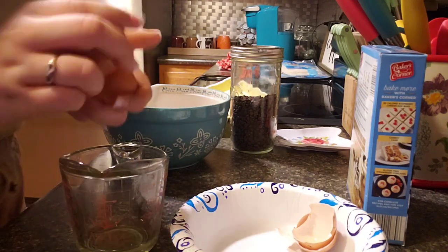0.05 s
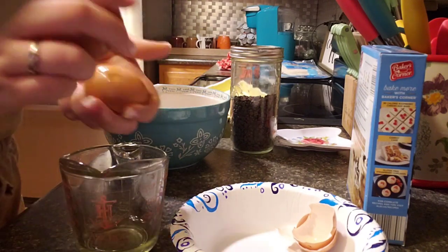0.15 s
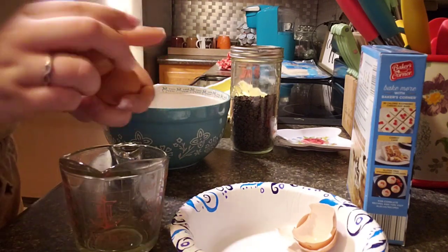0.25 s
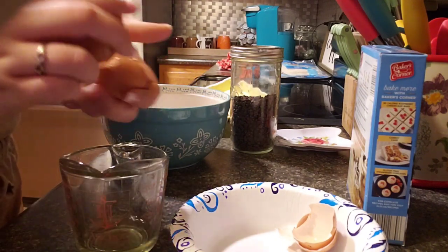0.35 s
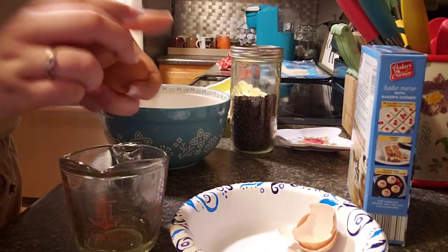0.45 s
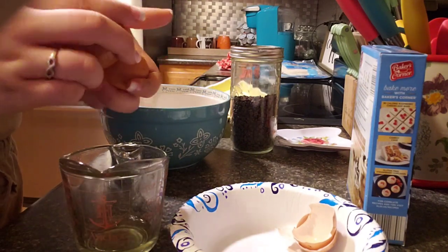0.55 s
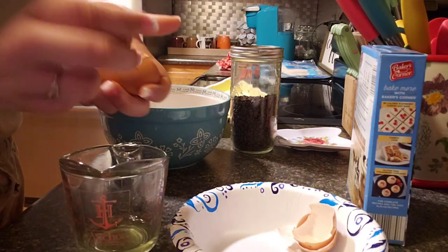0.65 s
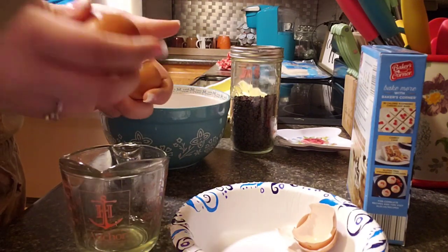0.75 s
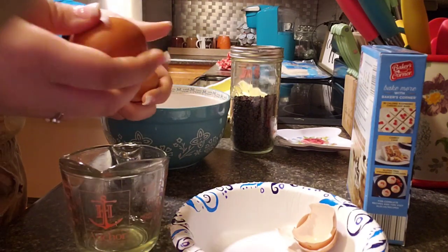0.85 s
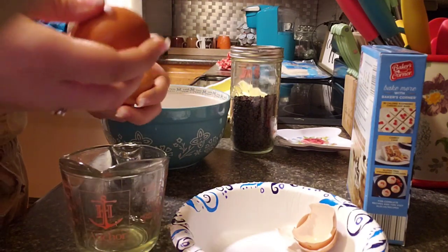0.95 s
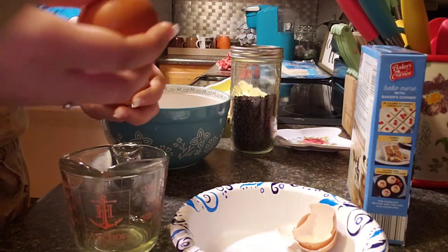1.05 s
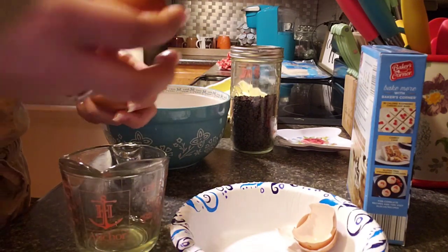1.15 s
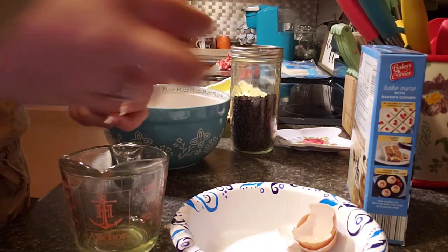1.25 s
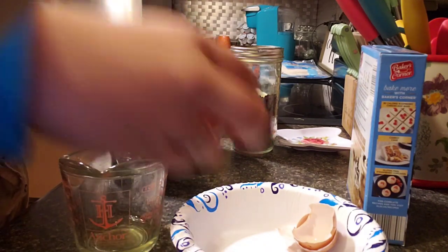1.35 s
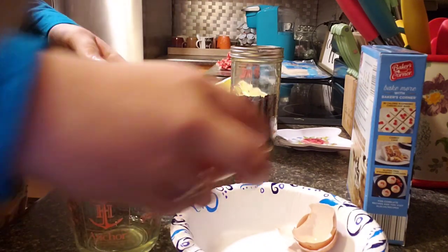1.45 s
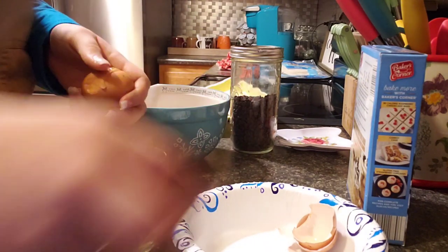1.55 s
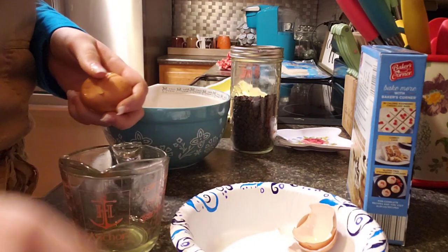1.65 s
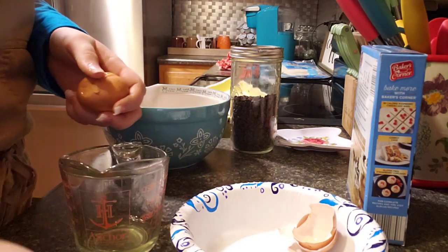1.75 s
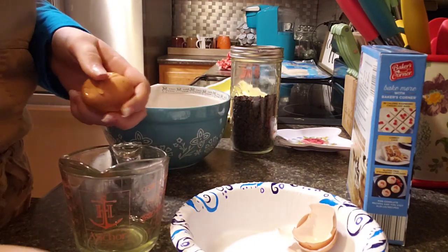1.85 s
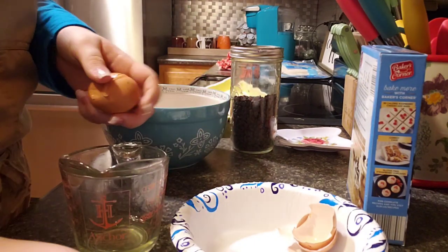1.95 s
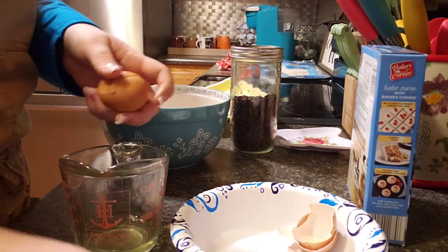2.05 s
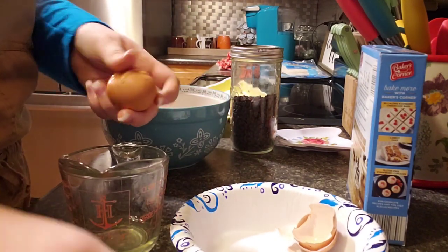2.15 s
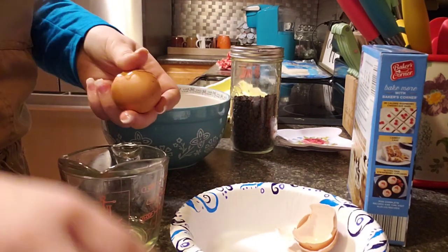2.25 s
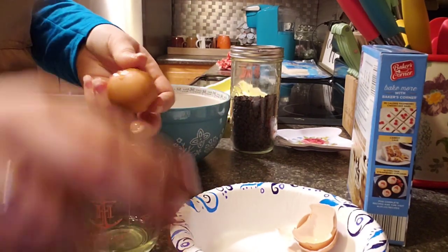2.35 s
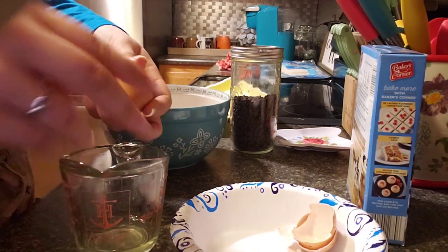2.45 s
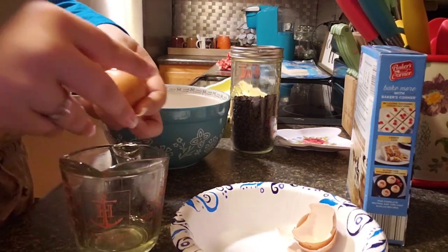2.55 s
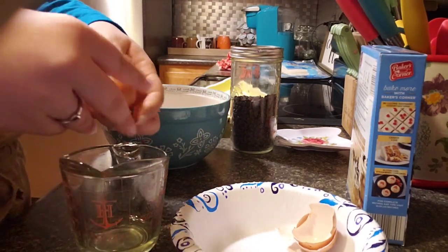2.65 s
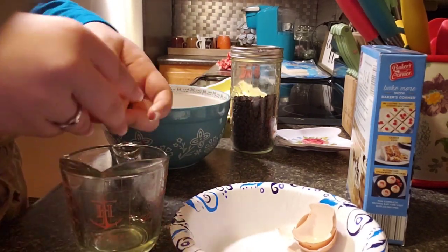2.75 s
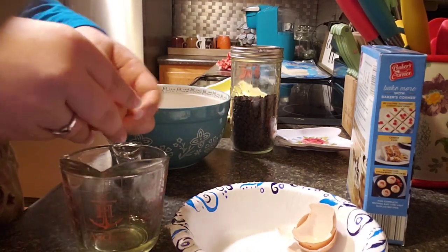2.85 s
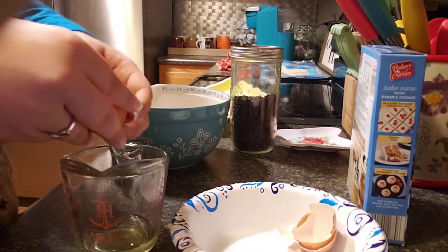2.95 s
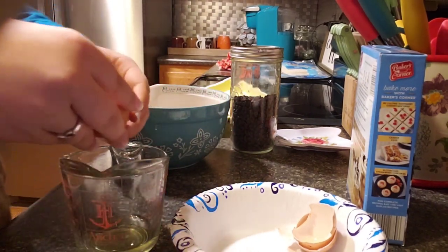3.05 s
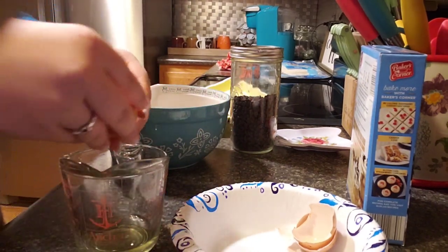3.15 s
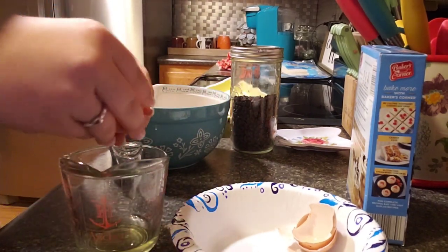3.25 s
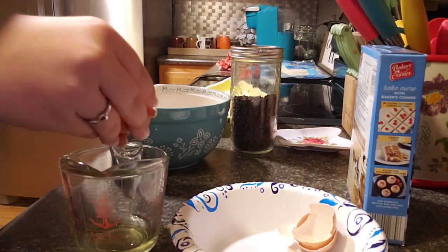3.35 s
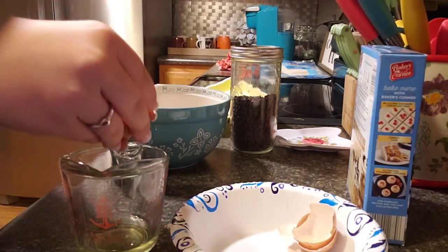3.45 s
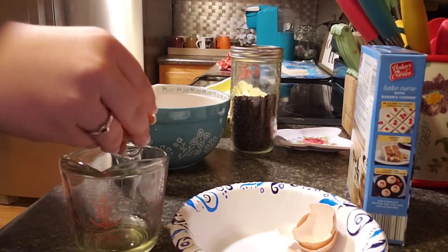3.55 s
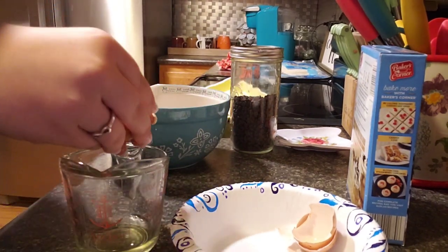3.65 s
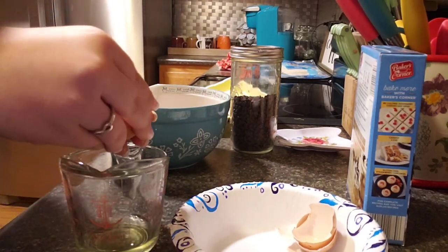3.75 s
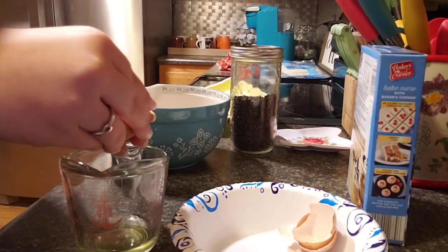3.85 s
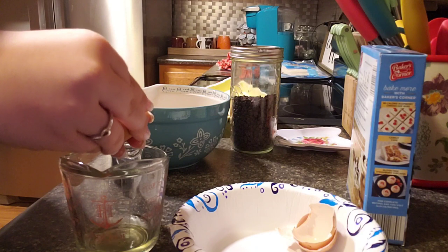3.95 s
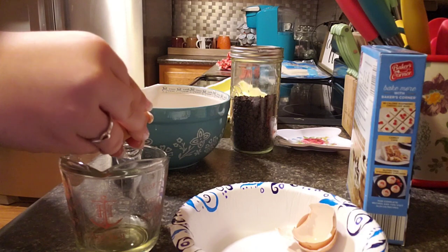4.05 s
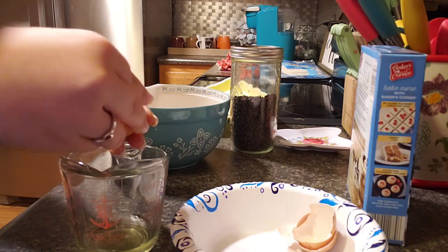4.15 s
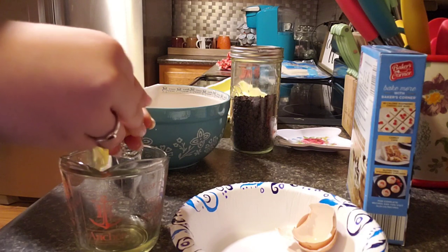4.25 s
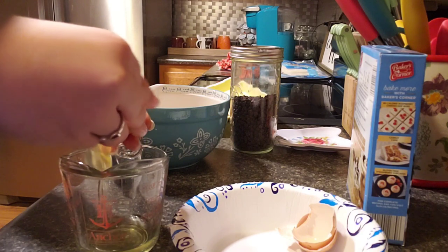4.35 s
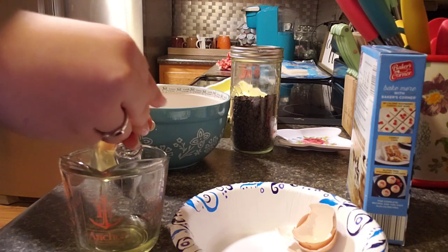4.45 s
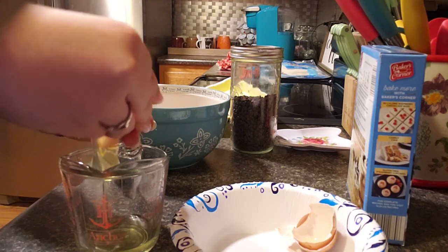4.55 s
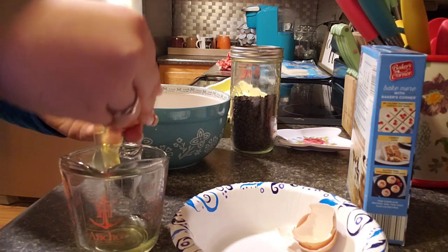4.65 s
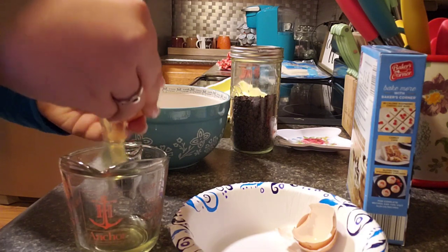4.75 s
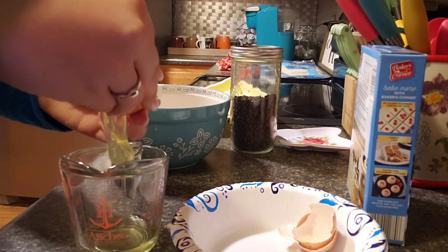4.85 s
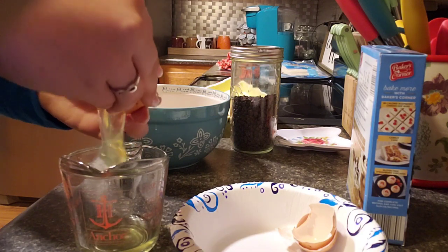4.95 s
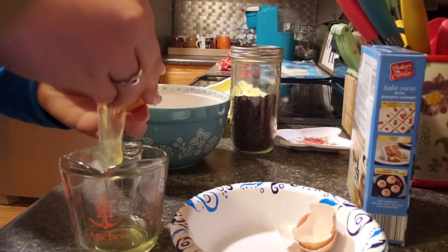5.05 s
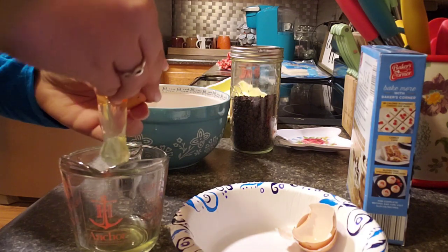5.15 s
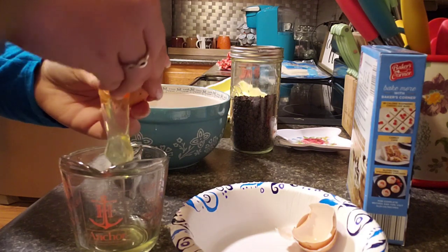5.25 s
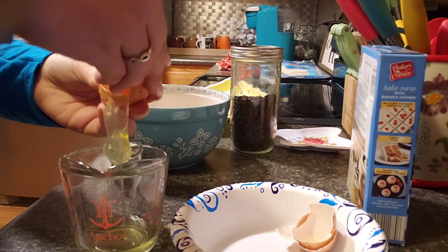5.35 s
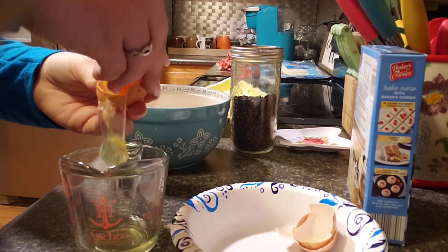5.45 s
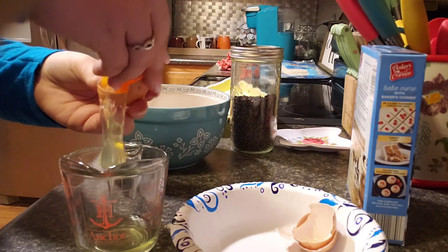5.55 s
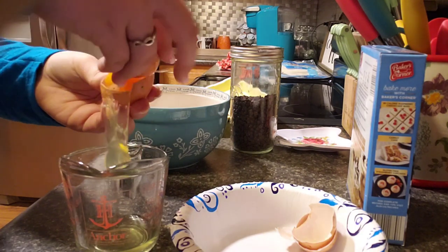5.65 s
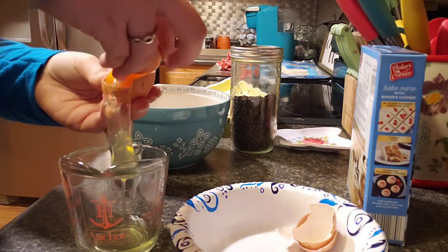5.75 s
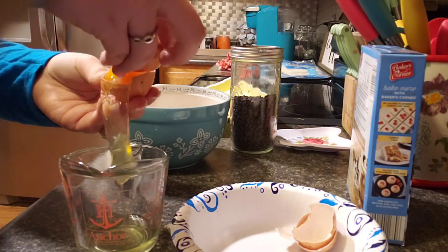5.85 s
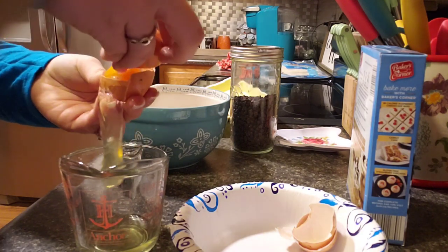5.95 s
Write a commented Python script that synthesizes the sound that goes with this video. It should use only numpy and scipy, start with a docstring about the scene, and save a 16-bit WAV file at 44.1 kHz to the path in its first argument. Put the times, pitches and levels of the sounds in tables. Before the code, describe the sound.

A close stereo pocket microphone hears a small, hard kitchen with steady low appliance rumble, airy noise and a very faint motor tone. The tail of an earlier tap fades at the start. Three sharp, brittle egg taps come at about 0.1, 0.3 and 0.5 seconds, the last weaker, the later two with a slight hollow knock. A tiny tick at 0.8 and soft hand rustles around 1 second follow. At 1.84 a dish lands with a dull, quick double thud and bright slap, then bumps and rocks faintly until 2.1. The egg rubs in the palm, gripped at 2.55; light rustling continues. From 2.8 small shell ticks gather, crackling toward one loud bright snap at 4.15. Lesser snaps follow, with a crunchy cluster near 4.8. Faint wet slips occur around 4.0 and 5.0. Soft ticks and rustles end the scene from 5.5 to 5.9.

```python
"""A small hard kitchen, heard close by through a two-port pocket microphone with slow gain control.
An egg is tapped three times on a rim: bursts of tiny breaks ring the shell and the hollow.
A dish set down and rocking rings in decaying modes. Thumbs prise the shell apart: short bursts ring
loose flakes, dense crackle sounds in a few bands. Hands rustle and egg white slips in swelling noise
bands; an appliance rumbles: steady air noise, a low boom, a faint band of hiss and a motor tone."""
import sys
import numpy as np
from scipy import signal
from scipy.io import wavfile
from scipy.ndimage import uniform_filter1d

SR = 44100
rng = np.random.default_rng(int(sys.argv[2]) if len(sys.argv) > 2 else 0)


def boost(x):
    """Linear amplitude factor 10**(x/20) for a level x in decibels (scalar or array-like)."""
    u = np.asarray(x, float) / 20
    return 10 ** u


def master_out(mix):
    """Clip the mix to full scale and print it as 16-bit PCM to the path in sys.argv[1]."""
    frames = np.transpose(np.atleast_2d(mix))
    ceiling = np.clip(frames, -1, 1)
    pcm = np.round(ceiling * 32767).astype(np.int16)
    wavfile.write(sys.argv[1], SR, pcm)


N = 264511

# egg taps on the rim [t/s, level/dB, treble tilt/(dB/octave), hollow knock re tap/dB, rise/s]
TAPS = [(0.0869, -4.5, -3, -39, 0.00062), (0.2988, -2.5, 2.5, -22.5, 0.0023),
        (0.5084, -9, 1, -19.5, 0.00067)]
# snaps under the thumbs [t/s, level/dB, loose flake f/Hz, treble tilt/(dB/octave)]
SNAPS = [(0.796, -45.5, 7480, 4), (2.8, -36.5, 6919, -5.5), (3.2135, -34, 8700, -1), (3.429, -31, 7080, 5),
         (3.835, -33.5, 12400, 3), (3.897, -33.5, 4460, -2.5), (3.9345, -30.5, 6976, -3.5),
         (4.0275, -21, 4560, -12), (4.0957, -28, 7840, -7), (4.1333, -26.5, 4480, -9),
         (4.1458, -3, 4690, 6), (4.3197, -23.5, 2420, -2.5), (4.4315, -23, 3745, 0),
         (4.7645, -21, 2560, -5), (4.7845, -15, 2800, -4), (4.7985, -15, 2600, -6),
         (5.6757, -29.5, 2250, -8), (5.707, -36.5, 2000, -1)]
TAP_S, SNAP_S = 0.017, 0.0054  # burst envelope down 25 dB
# resonances of the whole egg on the rim [f/Hz, width/Hz, level/dB]
SHELL_MODES = [(900, 76, 4), (1790, 130, 1.5), (2560, 240, 2), (7240, 71, -2), (9780, 300, -4.5)]
# broad radiation of the shell [f/Hz, level/dB]
SHELL_BODY = [(450, -22), (900, -18.5), (2700, -1), (8400, -7), (11000, -9.5), (16000, -21)]
# shell tearing in a dense crackle [t/s, length/s, level/dB, treble tilt/(dB/octave)]
CRUNCHES = [(4.023, 0.14, -49, -3.5), (4.158, 0.31, -60, -4.5), (4.682, 0.064, -59, -3),
            (4.752, 0.084, -44.5, -3.5), (4.805, 0.155, -66, -12.5)]
# bands of the crackle; the one near 3.7 kHz is coloured by the microphone port [f/Hz, width/Hz, level/dB]
CRACKLE_BANDS = [(2497, 670, -3.5), (3690, 600, -2), (4730, 710, -4)]
# thumbs strain the shell [t/s, rise/s, length/s, hiss level/dB, tick level/dB]
STRAINS = [(3.179, 0.045, 0.4, -62, -43.5), (3.543, 0.0259, 0.17, -82.5, -48.5),
           (3.73, 0.2, 0.36, -56, -39.5), (5.63, 0.072, 0.14, -54.5, -45)]
# dish lands and bounces, then bumps as it rocks [t/s, blow level/dB, hardness/0-1]
KNOCKS = [(1.8352, -17, 0.98), (1.8431, -23.5, 1), (1.971, -38.5, 0.75), (2.014, -43, 0.6),
          (2.113, -38.5, 0)]
# dish modes [f/Hz, level/dB, t60/s]
DISH_MODES = [(86, -3, 0.15), (281, -10, 0.08), (419, -1, 0.05), (480, -9, 0.08), (609, -9, 0.05),
              (692, -7, 0.06), (815, -4, 0.06), (923, -13, 0.04)]
# dish chatters as it rocks [start t/s, length/s, level/dB]
ROCKS = [(1.876, 0.073, -79), (1.968, 0.055, -84), (2.075, 0.046, -83.5)]
# dying room tail of an earlier tap (row at 0 s); then hands, sleeves and skin
# [t/s, rise/s, length/s, level/dB, centre f/Hz]
RUSTLES = [(0, .001, 0.12, -54, 2520), (0.966, 0.063, 0.23, -54, 3060), (0.984, 0.041, 0.53, -73, 6730),
           (1.096, 0.0045, 0.094, -51, 3240), (1.098, 0.05, 0.48, -55.5, 2610),
           (2.698, 0.35, 0.84, -61, 2650), (2.92, 0.1, 0.33, -60, 8240), (2.985, 0.15, 0.33, -56.5, 1480),
           (5.076, 0.04, 0.14, -60.5, 2330), (5.53, 0.0094, 0.1304, -65, 7970),
           (5.766, 0.074, 0.14, -60, 7300)]
# egg white slips [t/s, rise/s, length/s, level/dB, centre f/Hz]
SLOPS = [(4.027, 0.045, 0.23, -56.5, 614), (5.039, 0.017, 0.036, -48.5, 323)]
# egg turned in the palm, then gripped [t/s, rise/s, length/s, level/dB]
TURNS = [(1.882, 0.089, 1, -59), (2.555, 0.0048, 0.18, -52.5)]
# spectrum of the turning [f/Hz, relative level/dB]
TURN_COLOUR = [(1950, -9), (2350, 1.5), (3500, -1.5), (5000, -5), (6600, -5), (9800, -12.5), (14500, -15),
               (15600, -23.5)]
# spectrum of the steady air noise [f/Hz, relative level/dB]
AIR = [(45, -2), (67, -4.5), (90, -8.5), (190, -15), (260, -22.5), (400, -30.5), (800, -37.5), (1300, -43),
       (4000, -49.5), (16000, -55.5)]
# appliance motor tone [f/Hz, rms level/dB]
HUM = [(390, -74.5)]
# left-right likeness of the noises [f/Hz, likeness/0-1]
SAME = [(60, 1), (290, 0.887), (640, 0.085), (3100, 0.83), (15000, 0.95)]
# reverberation of the room [f/Hz, t60/s]
KITCHEN_T60 = [(300, 0.2), (1000, 0.67), (3000, 0.57), (8000, 0.43), (14000, 0.15)]
# microphone ports, left over right [f/Hz, level/dB]
PORTS = [(60, 2.5), (200, 9.5), (380, -2.5), (700, 4), (1290, 6.5), (2380, 19), (4400, 15.5), (8120, 0),
         (15000, -3.5)]
# left port cavity resonances [f/Hz, width/Hz, level/dB]
PORT_RINGS = [(3680, 150, 5.5), (7070, 1400, 4), (9670, 430, 7)]
# hollows in the response of both ports [f/Hz, width/Hz, level/dB]
PORT_DIPS = [(8480, 240, -8)]


def evened(x):
    """Scales to rms 1."""
    return x / np.sqrt(np.mean(x ** 2) + 1e-20)


def read(points, hz):
    """Interpolates a spectrum table on a log-frequency axis."""
    f, value = np.transpose(points)
    return np.interp(np.log(hz + 1), np.log(f + 1), value)


def add(mix, start_s, sound):
    """Mixes a sound in at start_s."""
    part = mix[round(start_s * SR):][:len(sound)]
    part += sound[:len(part)]


def resonate(x, hz, width_hz):
    """Two-pole resonance of peak gain 1."""
    r = np.exp(-np.pi * width_hz / SR)
    edge = (1 - r * r) / 2
    return signal.lfilter([edge, 0, -edge], [1, -2 * r * np.cos(2 * np.pi * hz / SR), r * r], x)


def causal(db, size=1024):
    """Minimum-phase taps for a dB curve on rfft bins."""
    log_gain = np.log(boost(np.concatenate([db, db[-2:0:-1]])))
    return np.fft.ifft(np.exp(log_gain - 1j * signal.hilbert(log_gain).imag)).real[:size]


def noise(field_db, patchy_db, size):
    """Two partly alike noise channels with drifting patches; field_db(hz, t) sets the level."""
    frames, hz = 4 * N // size + 5, np.fft.rfftfreq(size, 1 / SR)
    a, b, c, d, patches = rng.standard_normal((frames, len(hz), 5)).T
    patches = uniform_filter1d(patches, size=size // 64, axis=0)
    patches = evened(uniform_filter1d(patches, size=8, axis=1))
    same = read(SAME, hz)[:, None]
    left = a + 1j * b
    right = same * left + np.sqrt(1 - same ** 2) * (c + 1j * d)
    t = np.arange(frames) * size / 4 / SR
    z = np.array([left, right]) * boost(field_db(hz[:, None], t) + patchy_db * patches)
    return signal.istft(z, nperseg=size, noverlap=3 * size // 4)[1][:, :N] / size


def egg():
    """Taps, snaps, random strain ticks and crunches: near sound and what the room receives."""
    out = np.zeros((N, 2))
    for s, db, tilt_db, knock_db, rise_s in TAPS:
        add(out, s, fracture(db, TAP_S, tilt_db, None, knock_db, rise_s).T)
    for s, db, flake_hz, tilt_db in SNAPS:
        add(out, s, fracture(db, SNAP_S, tilt_db, flake_hz).T)
    ticks = 7  # per strain
    for s, rise_s, length_s, hiss_db, tick_db in STRAINS:
        for k, (late, loud, high) in enumerate(rng.uniform(-1, 1, (ticks, 3))):
            tick_s = s + length_s * (k + .5 + late / 2) / ticks
            flake_hz = 6840 * 2 ** (0.11 * high)
            add(out, tick_s, fracture(tick_db + 4 * loud, SNAP_S, 2.5, flake_hz).T)
    for s, *row in CRUNCHES:
        add(out, s, crunch(*row)[:, None])
    return out.T


def fracture(db, length_s, tilt_db, flake_hz=None, knock_db=-45, rise_s=0.0017):
    """A dying burst of breaks rings the whole egg, or one loose flake, and the hollow air inside."""
    t = np.arange(4096) / SR
    shape = (1 - np.exp(-t / rise_s)) * boost(-25 * (t / length_s) ** 1.067)
    shape *= 1 + 1.1 * boost(-60 * t / 0.005)  # early breaks stand out, t60 5 ms
    # rate above SR: a break at every sample
    body = shell_colour(shape * breaks(count=4096, per_s=52000, spread_db=1.5), tilt_db)
    if flake_hz is None:
        sound = 0.64 * body + sum(boost(d) * resonate(body, f, w) for f, w, d in SHELL_MODES)
    else:
        sound = 0.49 * without_bass(body) + 1.8 * resonate(body, flake_hz, 0.13 * flake_hz)
    sound *= np.linalg.norm(shape) / np.linalg.norm(sound) / 2.5  # headroom of peaks over rms
    hollow_hz, width_hz = 645, 170
    hollow = resonate(resonate(shape, hollow_hz, width_hz), hollow_hz, 4 * width_hz)
    hollow *= boost(knock_db) / abs(hollow).max()
    # summed over all directions the burst has a smooth spectrum
    click = shell_colour(1. * (t == 0), tilt_db)
    click *= np.linalg.norm(sound) / np.linalg.norm(click)
    return boost(db) * np.array([sound + hollow, click + hollow])


def crunch(length_s, db, tilt_db):
    """A clumpy stream of breaks, without bass, rings in a few shifting bands."""
    count = round(length_s * SR)
    clumps = boost(2.2 * evened(uniform_filter1d(rng.standard_normal(SR)[:count], size=200)))
    fade = np.linspace(1, 0, count) ** 0.56
    stream = breaks(SR, per_s=3500, spread_db=3.0)[:count] * clumps * fade
    body = without_bass(shell_colour(stream, tilt_db))
    piece = np.repeat(rng.integers(0, 5, 64), SR // 100)[:count]  # redrawn every 10 ms
    shifts = 1 + 0.05 * rng.uniform(-1, 1, (5, len(CRACKLE_BANDS)))  # tuning of the five pieces
    rings = 0
    for k, row in enumerate(shifts):
        for shift, (f, w, d) in zip(row, CRACKLE_BANDS):
            ring = resonate(body * (piece == k), f * shift, w)
            rings = rings + boost(d) * resonate(ring, f * shift, 2 * w)
    return boost(db) * evened(0.27 * body + rings)


def breaks(count, per_s, spread_db):
    """Random tiny breaks of uneven size and either sign."""
    chance, sign, size = rng.random((3, count))
    return (chance < per_s / SR) * np.sign(sign - .5) * boost(-spread_db * np.log(1 - size))


def shell_colour(x, tilt_db):
    """Broad radiation of the shell, tilted from 1.5 to 9 kHz."""
    hz = np.fft.rfftfreq(2048, 1 / SR)
    tilt = tilt_db * np.log2(np.clip(hz, 1500, 9000) / 4000)
    return signal.fftconvolve(x, causal(read(SHELL_BODY, hz) + tilt))[:len(x)]


def without_bass(x):
    """Small pieces radiate no bass."""
    return signal.sosfilt(signal.butter(4, 2000, "high", fs=SR, output="sos"), x)


def dish():
    """Blows and chatter drive the dish's modes; hard blows add a bright slap of rim on stone."""
    (push, bump, slap), t = np.zeros((3, N)), np.arange(N) / SR
    for s, db, hard in KNOCKS:
        blow = np.hanning(round(SR * 0.0011 * (1.05 - hard)) + 3)  # harder is shorter
        add(push if s < ROCKS[0][0] else bump, s, boost(db) * blow / blow.sum())
        puff = rng.standard_normal(1500) * boost(-60 * t[:1500] / 0.1)
        puff = resonate(resonate(puff, 610, 2000), 1200, 5800)
        add(slap, s, hard ** 2 * boost(db - 11) * puff)
    rocking, edge_s = 0, 0.012  # swell and fade of a rock
    for s, length_s, db in ROCKS:
        inside_s = np.minimum(t - s, s + length_s + edge_s - t)
        rocking = rocking + boost(db) * np.clip(inside_s / edge_s, 0, 1)
    chatter = uniform_filter1d((rng.random(N) < 250 / SR) * rng.standard_normal(N), size=36)
    bump += evened(chatter) * rocking
    # rocking on one edge drives mostly the region near 478 Hz
    push += 0.86 * bump + boost(8) * resonate(bump, 478, 60)
    t = t[:SR // 2]
    ring = sum(boost(d - 60 * t / t60) * np.sin(2 * np.pi * f * t) * (-1) ** k
               for k, (f, d, t60) in enumerate(DISH_MODES))
    return signal.oaconvolve(push, ring)[:N] + slap


def hands():
    """Opening tail, rustles, strains, slops and turns: noise bands swell and sink 15 dB by their length."""
    def field_db(hz, t):
        def band(centre_hz, octaves, order=2):
            return np.exp(-.5 * abs(np.log2((hz + 1) / centre_hz) / octaves) ** order)
        # rustles keep about one width in Hz, up to 0.75 octave
        rows = [(*row, band(f, min(1100 / f / np.log(2), .75), order=3)) for *row, f in RUSTLES]
        rows += [(*row, band(4900, 0.59)) for *row, tick_db in STRAINS]
        rows += [(*row, band(f, 0.62)) for *row, f in SLOPS]
        rows += [(*row, boost(read(TURN_COLOUR, hz)) ** 2 * (hz > 1000)) for row in TURNS]
        power = 1e-14
        for s, rise_s, length_s, db, colour in rows:
            age_s = t - s
            swell = np.clip(age_s / rise_s, 0, 1) * boost(-15 * np.clip(age_s / length_s, 0, 9) ** 2)
            power = power + (boost(db) * swell) ** 2 * colour / colour.sum()
        return 10 * np.log10(power * 256 ** 2)
    grain = boost(0.4 * evened(uniform_filter1d(rng.standard_normal(N), size=150)))
    return grain * noise(field_db, patchy_db=2.0, size=256)


def appliance():
    """Steady air noise, a low boom of narrow random noise, a faint band of hiss, a faint motor tone."""
    boom_hz, width_hz = 56.57, 0.91
    boom = resonate(resonate(rng.standard_normal(N), boom_hz, width_hz), boom_hz, 3 * width_hz)
    hiss = resonate(rng.standard_normal(N), 3830, 600)
    t = np.arange(N) / SR
    tones = sum(boost(db) * np.sqrt(2) * np.sin(2 * np.pi * (hz * t + rng.random())) for hz, db in HUM)
    air = noise(lambda hz, t: read(AIR, hz), patchy_db=1.5, size=2048)
    return boost(-47) * evened(air) + boost(-49.5) * evened(boom) + tones + boost(-77) * evened(hiss)


def kitchen(x, radiated):
    """Close echoes from counter and crockery, then a sparse tail dying band by band."""
    shared = 0.38  # likeness of the two ports

    def partly_shared(taps):
        taps[1] = shared * taps[0] + np.sqrt(1 - shared ** 2) * taps[1]

    near = np.zeros((2, 1000))
    at = rng.integers(30, 1000, (2, 14))
    echoes = rng.choice([-1., 1.], at.shape) * boost(-4 - 14 * at / 1000) / 2
    np.put_along_axis(near, at, echoes, 1)
    partly_shared(near)
    near[:, 0] = 1  # direct sound
    taps = np.zeros((2, SR))
    slots = np.arange(300, SR - 20, 20)
    at = slots + rng.integers(0, 20, (2, len(slots)))
    np.put_along_axis(taps, at, rng.choice([-1., 1.], at.shape), 1)
    partly_shared(taps)
    hz, t, z = signal.stft(taps, SR, nperseg=256)
    tail = signal.istft(z * boost(-60 * t / read(KITCHEN_T60, hz)[:, None]), SR, nperseg=256)[1]
    tail *= boost(-12) / np.linalg.norm(tail[0])
    close = signal.oaconvolve(x[None], near, axes=1)[:, :N]
    return close + signal.fftconvolve(radiated[None], tail, axes=1)[:, :N]


def scene():
    """Egg and dish in the room, over hands and appliance."""
    knocks = dish()
    lean_db = 4.5  # dish lands nearer the left port
    placed_dish = kitchen(knocks, knocks) * boost([[lean_db / 2], [-lean_db / 2]])
    return kitchen(*egg()) + placed_dish + hands() + appliance()


def roll_off(x):
    """The treble ends steeply here."""
    return signal.sosfilt(signal.butter(12, 16610, fs=SR, output="sos"), x)


def record(dry):
    """Ports colour each channel; gain sinks with loud hits and creeps back over seconds."""
    hz = np.fft.rfftfreq(4096, 1 / SR)

    def peaks_db(rows):
        return sum(db / (1 + (2 * (hz - f) / w) ** 2) for f, w, db in rows)

    lean_db = read(PORTS, hz)
    both_db = 6.5 + peaks_db(PORT_DIPS)
    left_db = np.minimum(lean_db, 0) + peaks_db(PORT_RINGS) + both_db
    right_db = both_db - np.maximum(lean_db, 0)
    ports = np.array([causal(left_db), causal(right_db)])
    x = signal.fftconvolve(dry, ports, axes=1)[:, :N]
    x = signal.sosfilt(signal.butter(4, 45, "high", fs=SR, output="sos"), x)
    power_db = 10 * np.log10(abs(uniform_filter1d((x ** 2).mean(0), size=500)) + 1e-12)
    sinking_db = 5 * np.maximum(power_db + 25.0, 0) / SR  # per sample, in step with the excess
    sinking_db[0] = 2.0  # gain starts out lowered
    recovery_s = 3
    duck_db = signal.lfilter([1], [1, -np.exp(-1 / (SR * recovery_s))], sinking_db)
    return roll_off(np.clip(x / boost(duck_db), -1, 1))


dry = scene()
out = record(dry)
master_out(out)
```